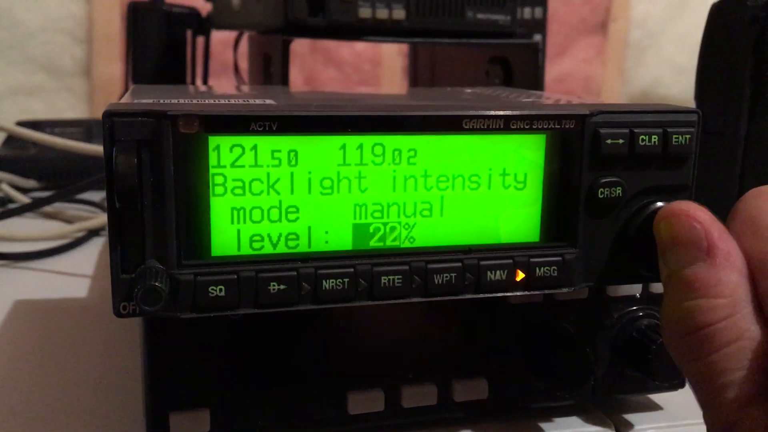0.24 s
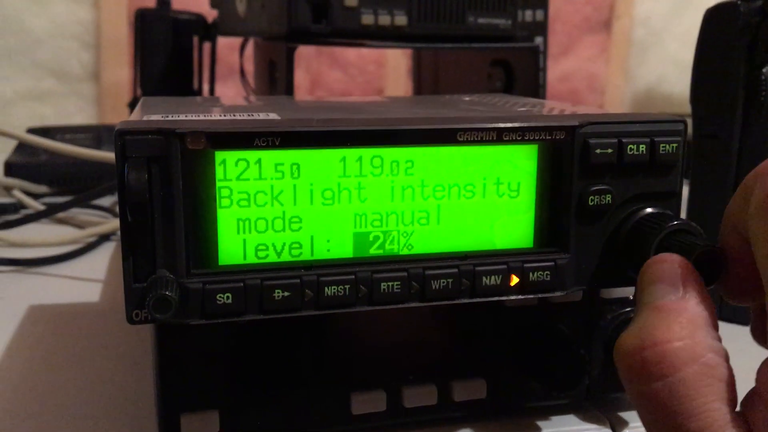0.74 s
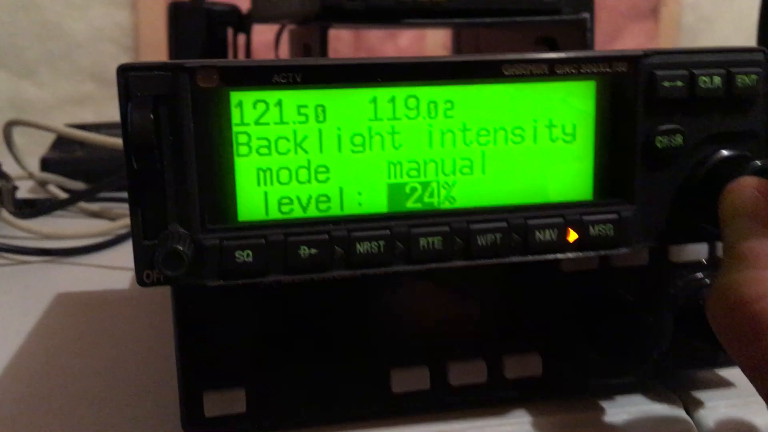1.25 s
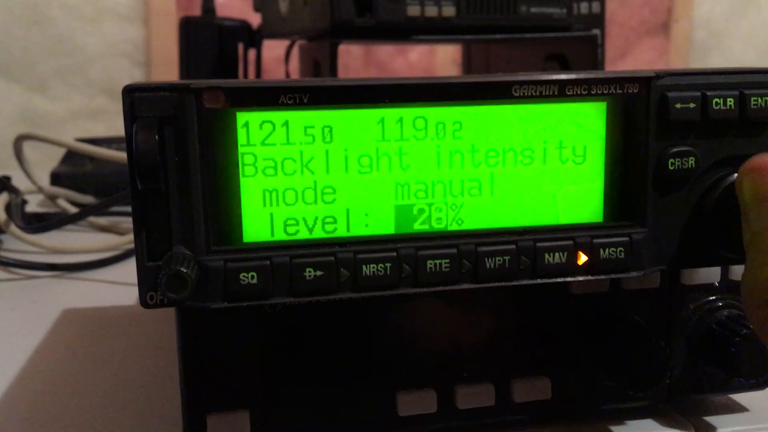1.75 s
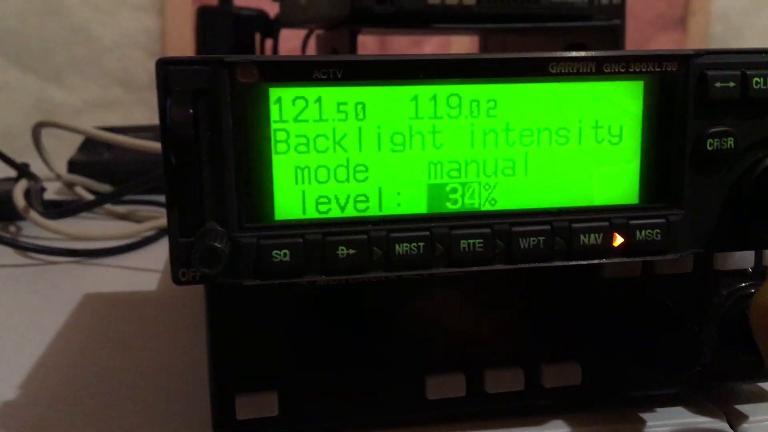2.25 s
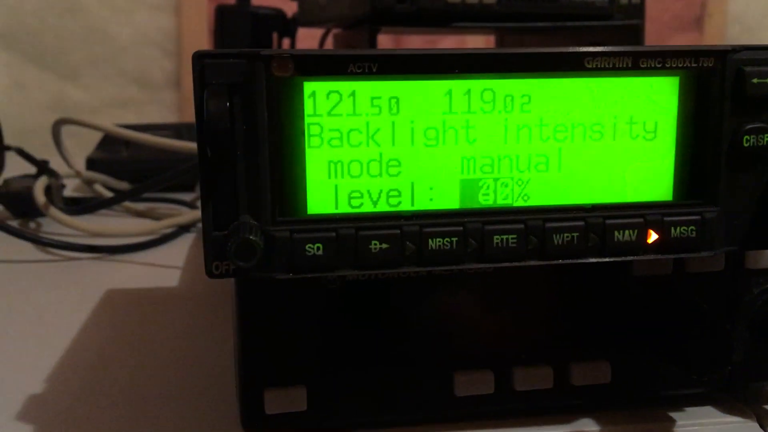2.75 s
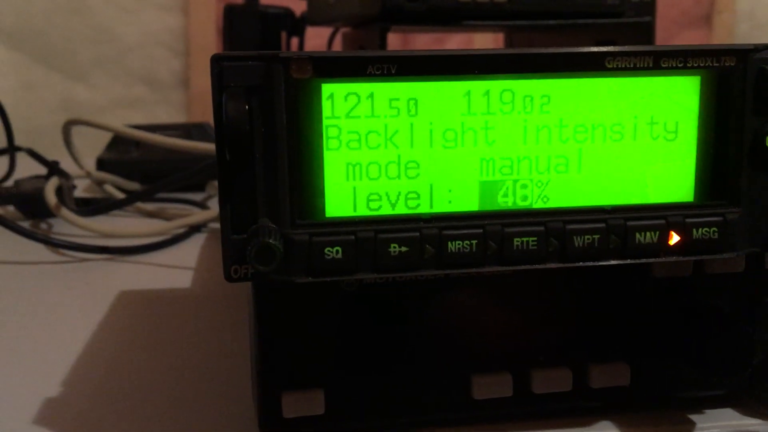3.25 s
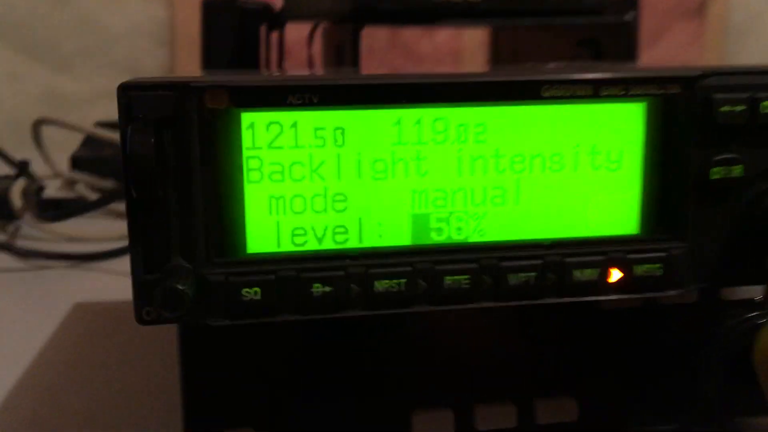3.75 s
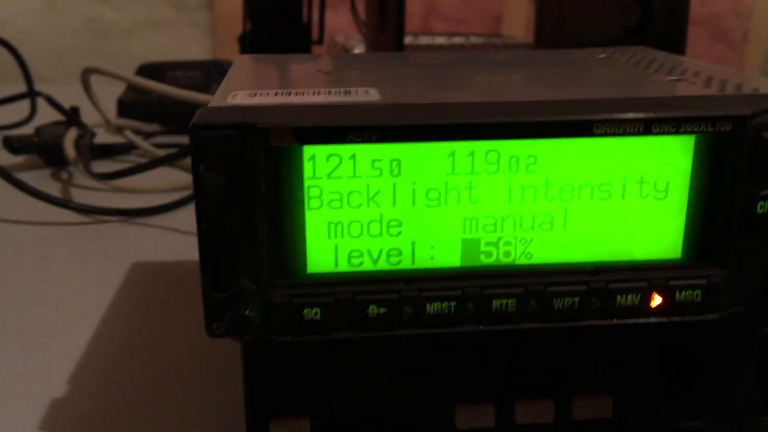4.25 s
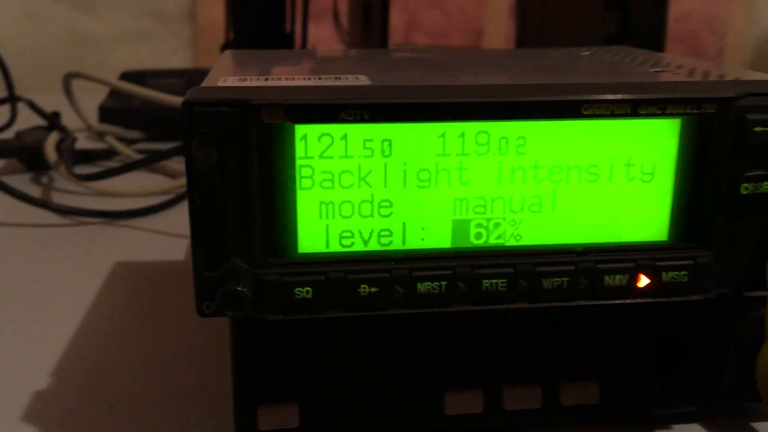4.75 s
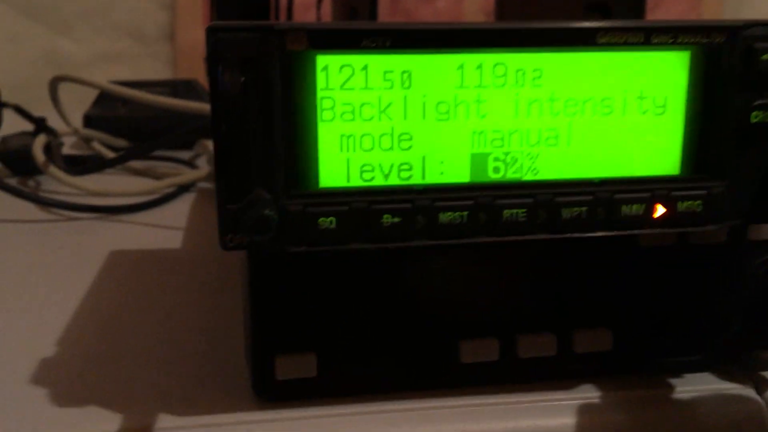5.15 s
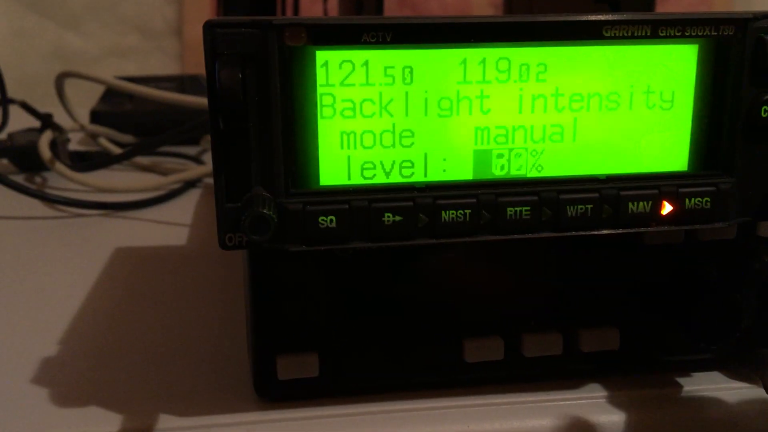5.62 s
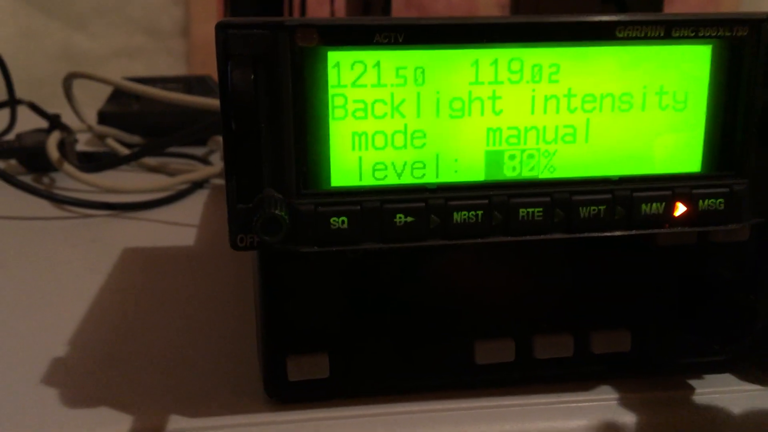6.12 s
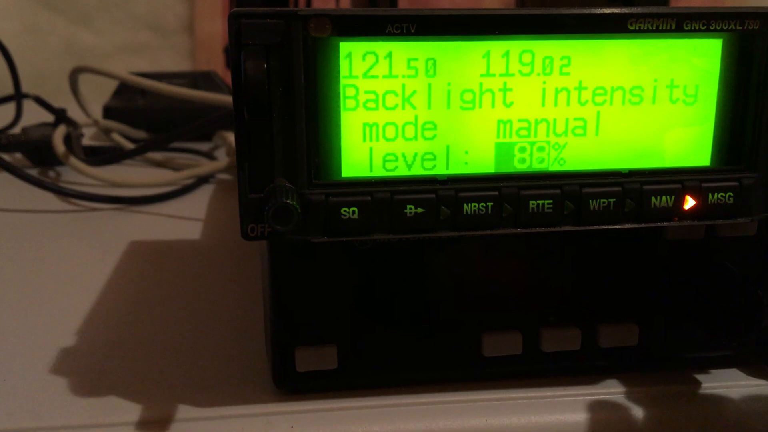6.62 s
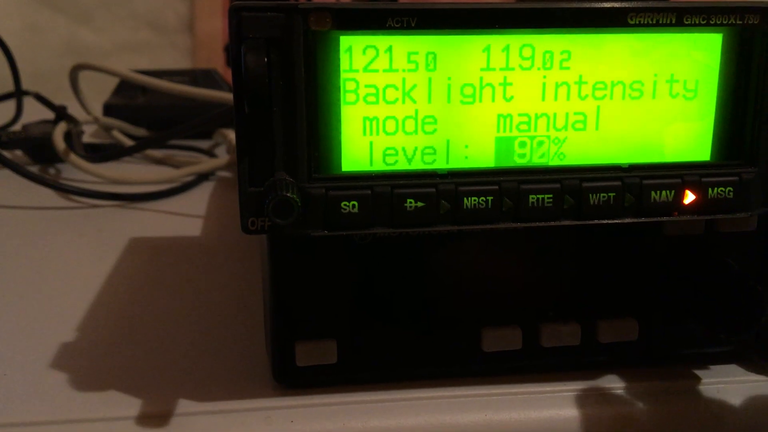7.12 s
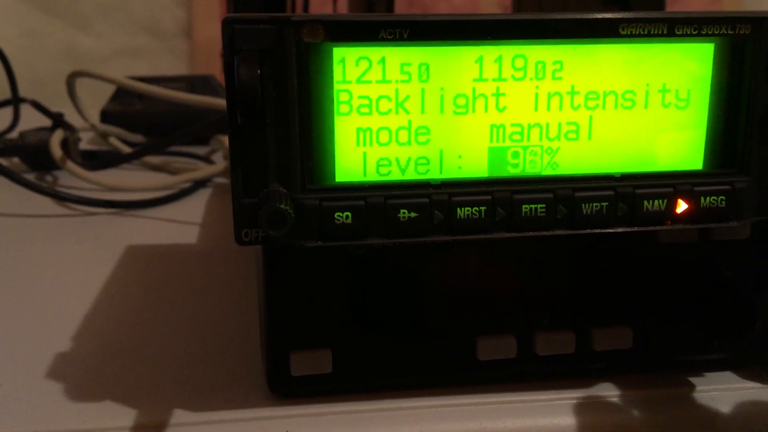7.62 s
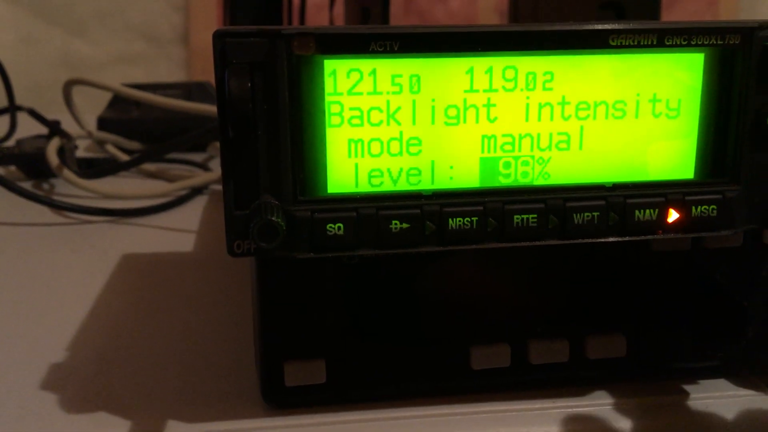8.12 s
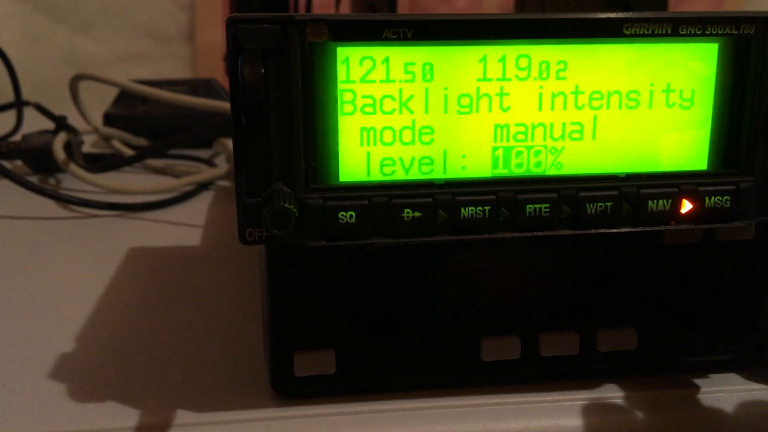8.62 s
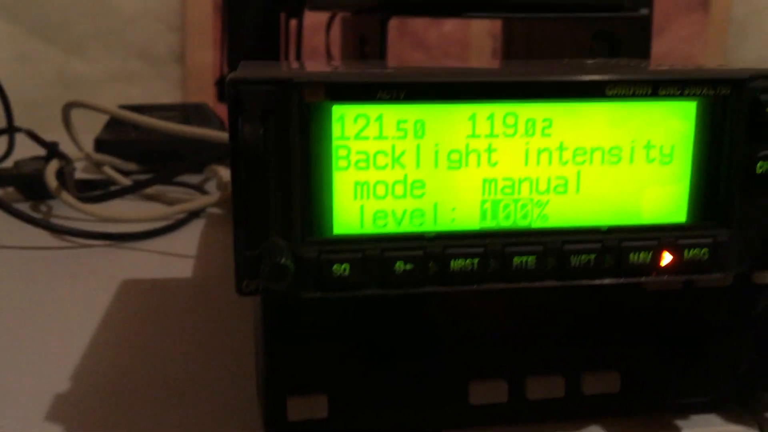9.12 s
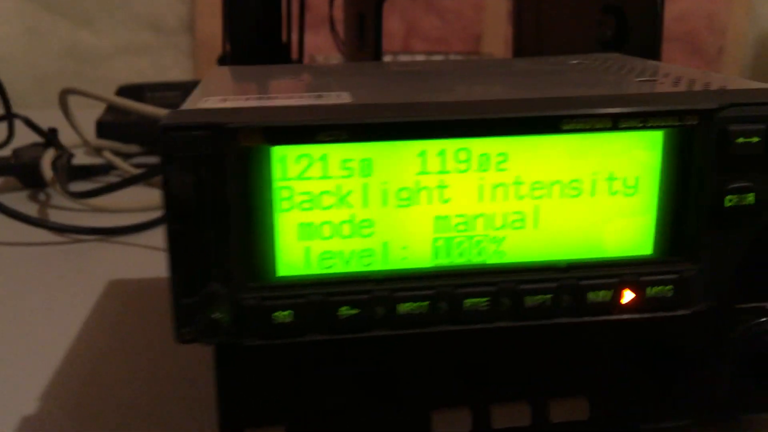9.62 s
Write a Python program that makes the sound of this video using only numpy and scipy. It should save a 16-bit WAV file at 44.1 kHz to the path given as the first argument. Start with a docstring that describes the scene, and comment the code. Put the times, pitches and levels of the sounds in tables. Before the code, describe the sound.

A notched knob on a metal-cased radio is turned by hand. Two separate clicks come first, then several quick runs of three to six clicks with short pauses between, thinning to pairs and single clicks near the end. Each click is sharp and bright, with a slight metallic ring and a soft low thump. A faint electrical hum and fan hiss continue throughout, heard close up in a small room.

```python
"""Detented knob on a bench radio

Mains hum, beating fans and air noise run throughout. The knob turns in single steps and quick runs.
At each step a spring snaps into its notch, rebounds and knocks the front panel.
The metal case rings on, the bench thumps and a small room answers."""
import sys
import numpy as np
from scipy import signal
from scipy.fft import rfft, irfft
from scipy.io import wavfile
from scipy.ndimage import uniform_filter1d

SR = 44100
rng = np.random.default_rng(int(sys.argv[2]) if len(sys.argv) > 2 else 0)


def generate_wav(sig):
    """Save sig (samples, or channels by samples) to the path in sys.argv[1] as 16-bit PCM at SR."""
    pcm = np.round(np.clip(np.atleast_2d(sig).T, -1, 1) * 32767).astype(np.int16)
    wavfile.write(sys.argv[1], SR, pcm)


N = 435266

# mains and fan tones (frequency [Hz], rms level [dB])
HUM_TONES = [(75.4, -83), (120, -66.5), (242.2, -75), (266, -69), (268.9, -63.5), (271.7, -73), (275, -67),
             (298.4, -71.5), (333, -81.5), (446.8, -94.5), (507, -74), (541, -80.5), (666, -76), (776, -75),
             (1131, -76), (1486, -75), (1892, -75.5), (2412, -76), (3838, -86.5), (10767, -102)]
# fan air spectrum (frequency [Hz], relative density [dB])
AIR_SPECTRUM = [(22, -11.5), (65, 6), (130, 1), (300, 0), (410, -5), (650, -4.5), (1100, -3.5),
                (1900, -3.5), (2400, -6), (2850, -10.5), (3800, -16), (8000, -27.5), (11500, -28),
                (15500, -36)]
# vent noise envelope (time [s], level [dB])
VENT_LEVELS = [(0, -63.5), (1.1, -63.5), (1.5, -66), (3.799, -84), (4.198, -73), (4.548, -70),
               (4.901, -72.5), (9, -95), (9.45, -64.5), (9.87, -63)]
# knob steps (time [s], spring snap drive [dB], panel knock drive [dB], contact tick drive [dB])
DETENTS = [(0.0171, -27, -32.5, -37), (0.3651, -24.5, -31, -31), (1.4389, -22.5, -29.5, -25.5),
           (1.5999, -20.5, -29, -25.5), (1.726, -19.5, -30.5, -28.5), (1.8437, -21, -30, -29),
           (1.952, -19, -30, -29), (2.3978, -16, -26, -27), (2.4498, -18, -27.5, -27),
           (2.5338, -20.5, -29, -27.5), (2.6204, -22.5, -30, -30), (2.7313, -25.5, -28.5, -28.5),
           (2.824, -21.5, -29.5, -28), (3.2018, -14.5, -30.5, -23.5), (3.2566, -18, -28.5, -27.5),
           (3.3432, -21, -30, -27), (3.4047, -19.5, -32, -29.5), (3.482, -18.5, -29.5, -28),
           (4.261, -19, -27.5, -26.5), (4.3806, -17.5, -28, -31), (4.5153, -25, -27, -33),
           (5.1627, -17, -29.5, -26), (5.3035, -27, -27, -30.5), (5.4191, -26.5, -26, -32.5),
           (5.47, -25.5, -28, -33.5), (5.5495, -22, -29, -29), (5.8657, -16.5, -27.5, -26.5),
           (5.9073, -19, -28, -26), (5.9475, -21.5, -28, -29), (5.9871, -22, -25.5, -31.5),
           (6.0385, -20, -29, -27), (6.356, -17.5, -26, -25.5), (6.3958, -17, -29, -27),
           (6.4588, -22, -27, -27.5), (6.9062, -16.5, -28, -26.5), (6.996, -21.5, -29, -28),
           (7.4576, -20.5, -28, -29), (7.566, -19.5, -28.5, -30.5), (7.9582, -22, -28.5, -26.5),
           (8.4431, -21.5, -29, -27)]
# finger grip; rows: knock, spring, tick (mean tilt [dB/oct], spread per step [dB/oct])
GRIP_TILTS = [(1, 2.3), (-3.2, 14), (-2.3, 3.8)]
# front panel and case (frequency [Hz], relative level [dB], t60 [s])
PANEL_MODES = [(663, -17, 0.1), (787, -13, 0.058), (1043, -2, 0.03), (1220, -6, 0.036), (1561, 3, 0.016),
               (1674, 5, 0.016), (1928, -1.5, 0.021), (2507, -12, 0.025)]
# detent spring and shaft (frequency [Hz], relative level [dB], t60 [s])
SPRING_MODES = [(3677, -14, 0.005), (3940, -13.5, 0.013), (4500, 0.5, 0.0098), (4722, 3, 0.0076),
                (5385, -0.5, 0.012), (5612, -1, 0.0093), (5940, -1, 0.0089)]
# small parts at the contact (frequency [Hz], relative level [dB], t60 [s])
TICK_MODES = [(7330, -10, 0.0066), (8284, 1, 0.0023), (9050, -6, 0.0038), (10485, -8, 0.0052),
              (11100, -2, 0.0052), (11870, -2.5, .005), (12400, -5.5, 0.0028), (14300, -21, 0.0049)]
# first reflections off bench and gear (mean delay [ms], gain [ratio])
ECHOES = [(3.6, 0.28), (6.4, -0.15), (9.3, 0.022), (12.2, -.09)]
# lasting ring of the sheet-metal case (frequency [Hz], level re click [dB], t60 [s])
CASE_MODES = [(1780, -26.5, .25), (1830, -30.5, 0.29), (2112, -25, 0.28), (4430, -37, .2), (5270, -30, .3),
              (5450, -27.5, .28), (5620, -36, 0.27), (6170, -32.5, .25), (9180, -32, .26),
              (9420, -30.5, 0.259), (12600, -38, .18)]
# low bench modes (frequency [Hz], level re thump [dB], t60 [s])
BENCH_MODES = [(126.4, -11, 0.26), (211, -17.5, .25), (72, -21, .3), (243, -34, 0.29)]
# room tail (frequency [Hz], density re click [dB], t60 [s])
ROOM_BANDS = [(30, -8.5, .3), (70, 1.5, .35), (149.5, 2.5, 0.55), (371, -2, 0.17), (657, -2.5, 0.19),
              (1523, 5.5, 0.14), (2070, 1.5, .38), (2560, -3, 0.16), (4200, -7, 0.38), (5760, -4, 0.4),
              (6900, -10.5, 0.32), (9200, -11, 0.3), (10480, -12, 0.32), (12470, -10.5, 0.3),
              (15500, -20, .21)]
# shaft taking up slack (time [s], level [dB])
SLACK_TICKS = [(3.103, -69), (6.857, -69)]
# microphone port dips (frequency [Hz], width [Hz], gain [dB])
MIC_DIPS = [(2885, 610, -6), (10480, 530, -8.5)]

KNOCK_GAIN_DB, SPRING_GAIN_DB, TICK_GAIN_DB = -6.5, -12.5, -5  # radiation, added to the drives
REBOUND_RANGE_MS, REBOUND_RANGE_RATIO = (0.65, 1.9), (0.25, 0.88)
THUMP_DB, GRIP_HOLD_DB, GRIP_EASE_S = -34.5, -5, 0.069  # grip holds the thump down in quick runs


def amp(db):
    """Decibels to gain."""
    return 10 ** (np.asarray(db) / 20)


def unit_rms(x):
    """Scale to rms 1."""
    return x / np.sqrt(np.mean(x ** 2) + 1e-20)


def log_interp(table, hz, column=1):
    """Table column on a log-frequency axis."""
    columns = np.transpose(table)
    return np.interp(np.log(hz + 1), np.log(columns[0] + 1), columns[column])


def add(mix, at_s, sound):
    """Mix a sound in place."""
    part = mix[max(round(at_s * SR), 0):][:len(sound)]
    part += sound[:len(part)]


def noise(spectrum):
    """Steady noise, rms 1, shaped by (frequency [Hz], density [dB])."""
    gain = amp(log_interp(spectrum, np.fft.rfftfreq(N, 1 / SR)))
    return unit_rms(irfft(rfft(rng.standard_normal(N)) * gain, N))


def drift(points):
    """Slow random curve across the scene."""
    return np.interp(np.linspace(0, points - 1, N), np.arange(points), rng.standard_normal(points))


def hum(waver_ratio=0.0012, sway_db=0.5):
    """Wavering mains and fan tones; fans of nearly equal speed beat."""
    out = np.zeros(N)
    for hz, db in HUM_TONES:
        cycles = np.cumsum(hz * (1 + waver_ratio * drift(points=24))) / SR + rng.random()
        peak = np.sqrt(2) * amp(db - sway_db * drift(points=14))
        out += peak * np.sin(2 * np.pi * cycles)
    return out


def fan_air(rush_db=-59.5, sway_db=0.3):
    """Steady fan rush, plus midrange vent noise that fades and returns."""
    vent_db = np.interp(np.arange(N) / SR, *np.transpose(VENT_LEVELS))
    vent = noise([(330, -20), (500, 17), (800, 13.5), (1250, 16), (1700, -28), (3000, -45.5)])
    rush = amp(rush_db + sway_db * drift(points=40)) * noise(AIR_SPECTRUM)
    return rush + amp(vent_db) * vent


def contact_force(size, rebound_ms, rebound_ratio, chatter_ms=0.48, slide_ms=0.13):
    """Force on the notch: snap 1 ms in, then a rebound; each slides in and chatters out."""
    t_ms = np.arange(size) / SR * 1000 - 1
    grit, force = rng.standard_normal(size), np.zeros(size)
    for at_ms, strength in ((0, 1), (rebound_ms, rebound_ratio)):
        gap_ms = abs(t_ms - at_ms)
        slide = 0.031 * np.exp(-gap_ms / slide_ms)
        chatter = 0.58 * np.exp(-gap_ms / chatter_ms)
        force += strength * grit * np.where(t_ms < at_ms, slide, chatter)
        force[np.argmin(gap_ms)] += strength
    # even out the random grit's spectrum so each click sounds less coloured
    spectrum = rfft(force)
    return irfft(spectrum / np.sqrt(abs(spectrum) + 1e-9), size) * (t_ms < 10)


def ring(force, modes, tilt_db_oct, rise_cycles, scatter_db=1.6, detune_ratio=0.011):
    """Force-driven modes, scattered per hit; energy equals 10 ms at rms 1."""
    hz, db, t60_s = np.transpose(modes)[:, :, None]
    t = np.arange(len(force)) / SR
    level_draw, pitch_draw = rng.standard_normal((2, len(hz), 1))
    db = db + scatter_db * level_draw + tilt_db_oct * np.log2(hz / hz[0])
    hz = hz * (1 + detune_ratio * pitch_draw)
    rise = 1 - np.exp(-hz * t / rise_cycles)  # low modes build later: pitch sinks
    tones = amp(db - 60 * t / t60_s) * np.sin(2 * np.pi * hz * t) * rise
    sound = signal.fftconvolve(force, tones.sum(0))[:len(t)]
    return sound / np.sqrt(np.sum(sound ** 2) / (0.01 * SR))


def click(knock_db, spring_db, tick_db, force, tilts_db_oct):
    """One snap rings panel, spring and small parts; grip tilts each spectrum."""
    knock = amp(knock_db) * ring(force, PANEL_MODES, tilts_db_oct[0], rise_cycles=3.2)
    spring = amp(spring_db) * ring(force, SPRING_MODES, tilts_db_oct[1], rise_cycles=1.1)
    tick = amp(tick_db) * ring(force, TICK_MODES, tilts_db_oct[2], rise_cycles=0.61)
    return knock + spring + tick


def with_echoes(direct, cutoff_hz=5000):
    """Direct sound plus dulled first reflections; delays vary per click."""
    out = direct.copy()
    dull = signal.lfilter(*signal.butter(1, cutoff_hz, fs=SR), direct)
    for delay_ms, gain in ECHOES:
        add(out, delay_ms / 1000 * rng.uniform(0.92, 1.08), gain * dull)
    return out


def body_ring(modes, swell_s, scatter_db, size=14000):
    """Case or bench modes that swell after a click and ring on."""
    hz, db, t60_s = np.transpose(modes)[:, :, None]
    t = np.arange(size) / SR
    db = db + scatter_db * rng.standard_normal(hz.shape)
    tones = amp(db - 60 * t / t60_s) * np.sin(2 * np.pi * (hz * t + rng.random(hz.shape)))
    return tones.sum(0) * (1 - np.exp(-t / swell_s))


def room_tail(knock_db, spring_db, tick_db, size=22050, build_s=0.007, ripple_db=2.6):
    """Diffuse decay with the broad colour of the click's three parts."""
    t = np.arange(size) / SR
    hz, frame_s, bands = signal.stft(rng.standard_normal(size), SR, nperseg=256)
    click_db = log_interp([(2000, knock_db), (4600, spring_db), (11000, tick_db)], hz)
    # chatter favours random narrow bands
    ripple = unit_rms(uniform_filter1d(rng.standard_normal(len(hz)), size=2))
    band_db = click_db + log_interp(ROOM_BANDS, hz) + ripple_db * ripple
    t60_s = log_interp(ROOM_BANDS, hz, column=2)[:, None]
    decay = amp(band_db[:, None] - 60 * frame_s / t60_s)
    energy_gain = np.sqrt(2 * np.log(1000) * 0.01 / t60_s)  # same 10 ms reference as ring()
    tail = signal.istft(bands * decay * energy_gain, SR, nperseg=256)[1][:size]
    return tail * (1 - np.exp(-t / build_s))


def knob(case_spread_db=1):
    """Detent clicks with case, bench and room; rebound and grip tilt are random per step."""
    out, steps = np.zeros(N), len(DETENTS)
    pauses_s = np.diff(np.transpose(DETENTS)[0], prepend=-np.inf)
    mean_db_oct, spread_db_oct = np.transpose(GRIP_TILTS)
    lateness, hardness = rng.random((steps, 2)).T
    rebounds_ms = np.interp(lateness, (0, 1), REBOUND_RANGE_MS)
    rebound_ratios = np.interp(hardness, (0, 1), REBOUND_RANGE_RATIO)
    tilts_db_oct = mean_db_oct + spread_db_oct * rng.standard_normal((steps, len(GRIP_TILTS)))
    for step, (at_s, snap_db, panel_db, contact_db) in enumerate(DETENTS):
        knock_db = panel_db + KNOCK_GAIN_DB
        spring_db = snap_db + SPRING_GAIN_DB
        tick_db = contact_db + TICK_GAIN_DB
        case_db = (spring_db + tick_db) / 2 + case_spread_db * rng.standard_normal()
        thump_db = THUMP_DB + GRIP_HOLD_DB * np.exp(-pauses_s[step] / GRIP_EASE_S)
        force = contact_force(4096, rebounds_ms[step], rebound_ratios[step])
        direct = click(knock_db, spring_db, tick_db, force, tilts_db_oct[step])
        add(out, at_s - 0.001, with_echoes(direct))
        add(out, at_s, amp(case_db) * body_ring(CASE_MODES, swell_s=0.0021, scatter_db=0))
        add(out, at_s, amp(thump_db) * body_ring(BENCH_MODES, swell_s=0.014, scatter_db=3))
        add(out, at_s, room_tail(knock_db, spring_db, tick_db))
    return out


def shaft_slack():
    """Faint ticks as the shaft takes up slack before a step."""
    out = np.zeros(N)
    for at_s, db in SLACK_TICKS:
        force = contact_force(SR // 20, rebound_ms=0, rebound_ratio=0)
        spring = ring(force, SPRING_MODES, tilt_db_oct=0, rise_cycles=0.9)
        tick = ring(force, TICK_MODES, tilt_db_oct=-27, rise_cycles=0.88)
        add(out, at_s, amp(db) * (spring + tick))
    return out


def scene():
    """Knob over hum and fan noise, mono."""
    return (knob() + shaft_slack() + hum() + fan_air())[None]


def record(dry, low_cut_hz=32, high_cut_hz=16300):
    """Microphone port dips, then band limits."""
    for hz, width_hz, db in MIC_DIPS:
        notched = signal.lfilter(*signal.iirnotch(hz, hz / width_hz, fs=SR), dry)
        dry = notched + amp(db) * (dry - notched)
    dry = signal.lfilter(*signal.butter(2, low_cut_hz, "high", fs=SR), dry)
    lowpass = signal.firwin(121, high_cut_hz, window=("kaiser", 8), fs=SR)
    return signal.oaconvolve(dry, lowpass[None], "same")


dry = scene()
out = record(dry)
generate_wav(out)
```